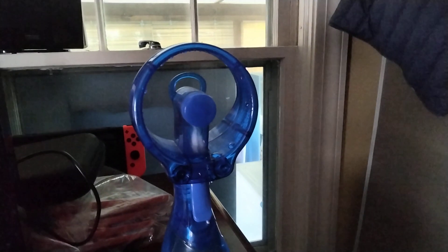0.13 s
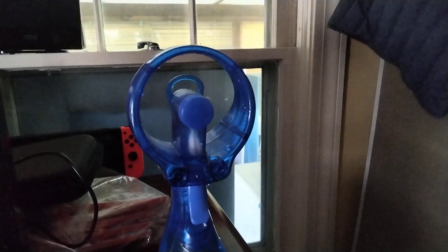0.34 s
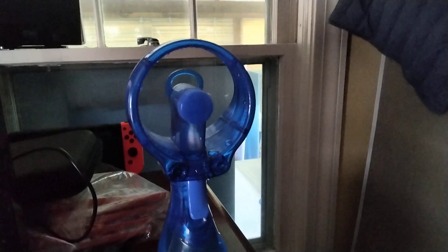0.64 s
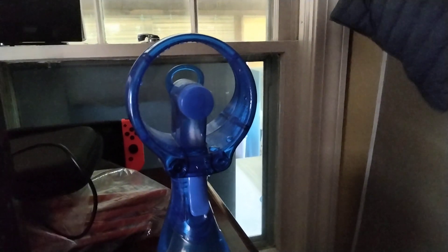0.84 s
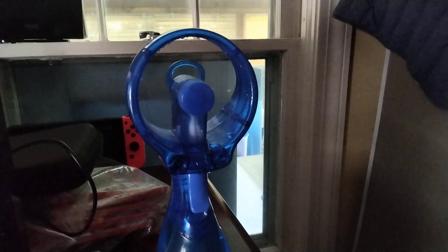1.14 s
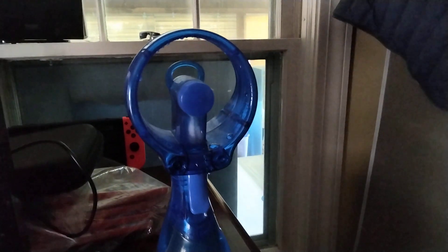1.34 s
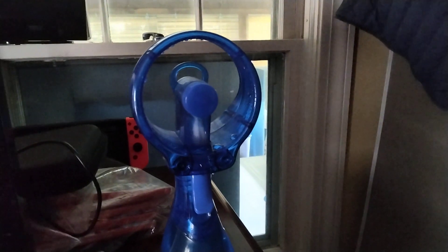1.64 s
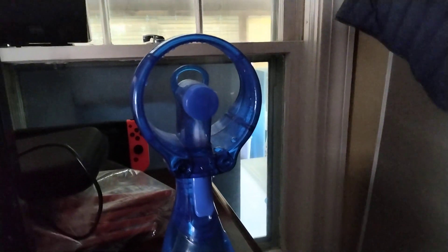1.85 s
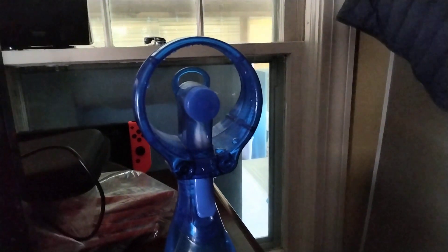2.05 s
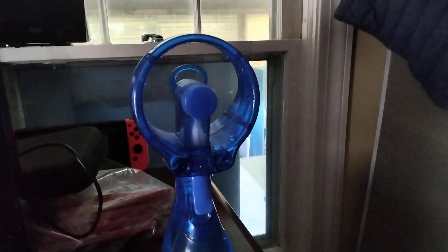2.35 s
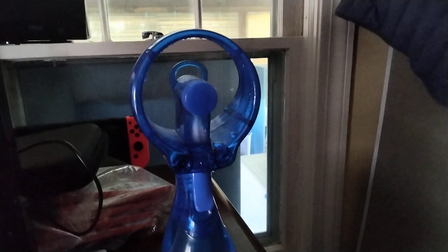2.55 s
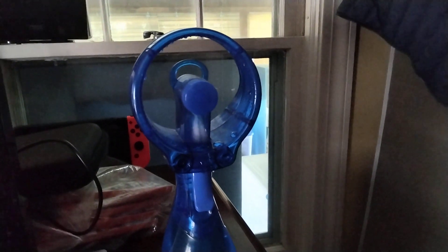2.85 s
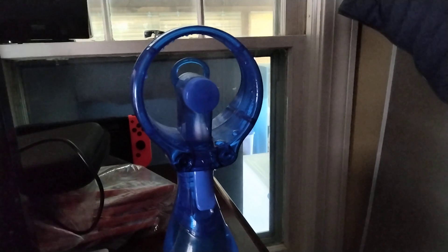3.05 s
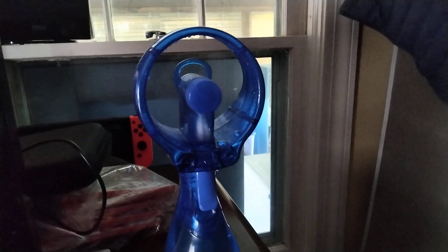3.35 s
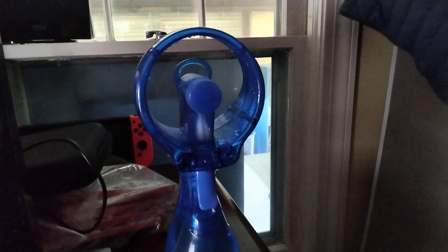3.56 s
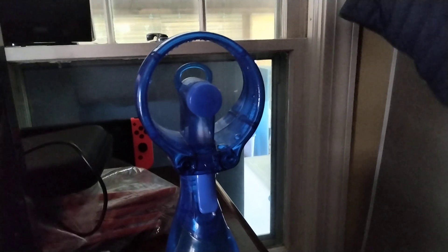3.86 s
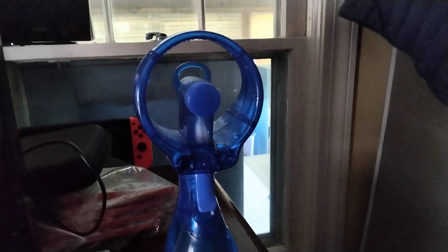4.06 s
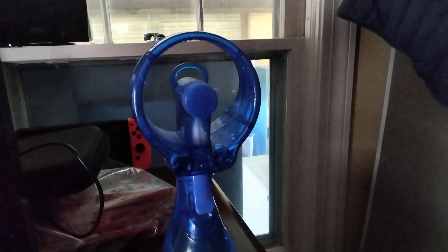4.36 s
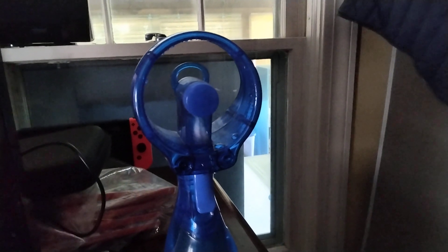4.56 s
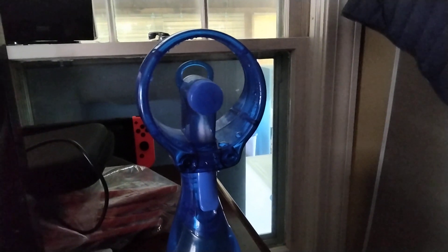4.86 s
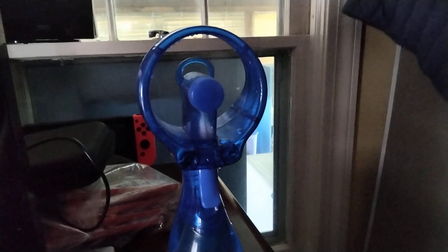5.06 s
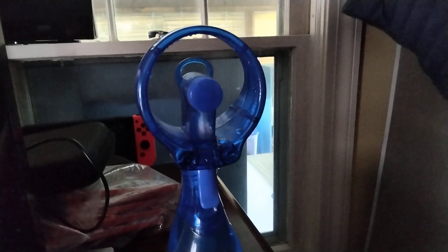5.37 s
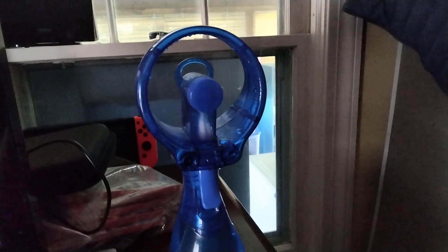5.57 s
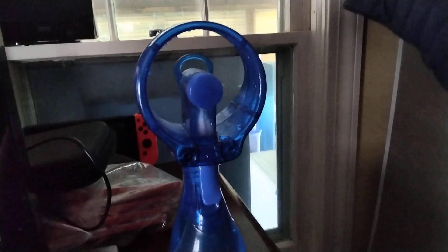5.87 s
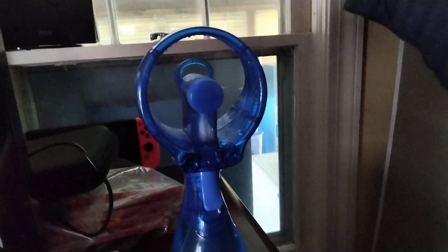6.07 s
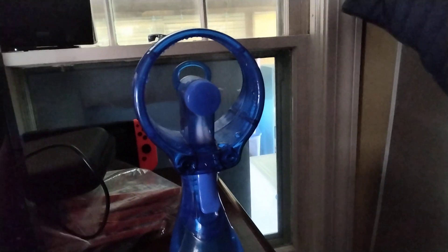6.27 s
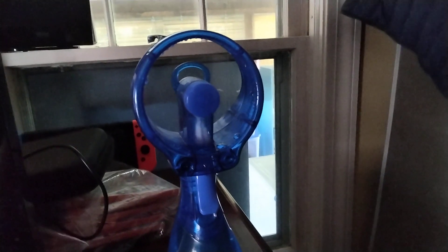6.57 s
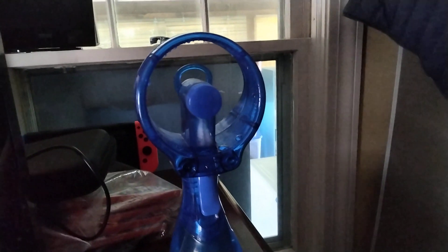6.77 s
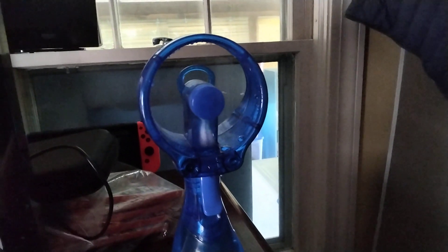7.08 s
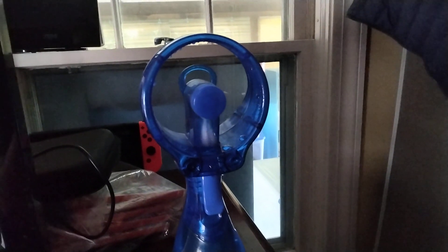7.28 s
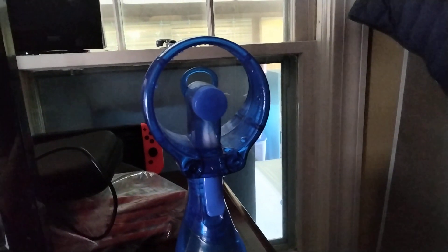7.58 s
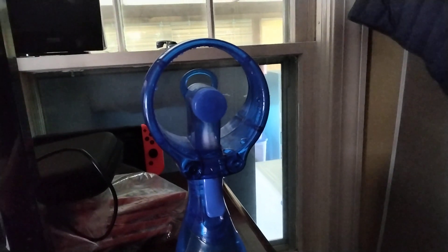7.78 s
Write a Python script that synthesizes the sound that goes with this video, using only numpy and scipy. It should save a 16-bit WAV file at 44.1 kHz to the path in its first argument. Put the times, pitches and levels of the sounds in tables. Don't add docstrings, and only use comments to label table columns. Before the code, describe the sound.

Steady close-up run of a tiny handheld fan indoors: deep fluttering wind rumble, stronger on the right, soft air rush and faint shrill buzzing whine.

```python
import sys
import numpy as np
from scipy import signal
from scipy.fft import rfft, irfft, next_fast_len
from scipy.io import wavfile
from scipy.ndimage import uniform_filter1d, map_coordinates

SR = 44100
rng = np.random.default_rng(int(sys.argv[2]) if len(sys.argv) > 2 else 0)


def transcribe(u):
    v = np.clip(np.atleast_2d(u).T, -1, 1)
    q = np.round(v * 32767).astype(np.int16)
    wavfile.write(sys.argv[1], SR, q)


def ratio(d):
    e = np.asarray(d, float) / 20
    return 10 ** e


N = 350154

LEFT_LAG_SAMPLES = 5.55


def rms_one(x):
    return x / np.sqrt(np.mean(x ** 2) + 1e-20)


def drift(rate, size, per_s):
    at = np.arange(size) * rate / per_s
    knots = rng.standard_normal((2, int(size * 40 / per_s) + 9))
    grid = np.arange(knots.shape[1])
    first = np.interp(at, grid, knots[0])
    second = np.interp(at * .63 + .5, grid, knots[1])
    return .87 * first + .87 * second


def colour(x, spectrum, rate):
    size = next_fast_len(len(x))
    hz = np.fft.rfftfreq(size, 1 / rate) + 1e-3
    table = np.array([(1, -90)] + list(spectrum) + [(rate, -90)])
    gain = ratio(np.interp(np.log(hz), np.log(table[:, 0]), table[:, 1]))
    return irfft(rfft(x, size) * gain, size)[:len(x)]


def lagged(x, samples):
    size = next_fast_len(N)
    delay = np.exp(-2j * np.pi * samples * np.fft.rfftfreq(size))
    return irfft(rfft(x, size) * delay, size)[:N]


def rush():
    # f/Hz, density/dB per Hz
    air_spectrum = [(60, -37), (200, -2.5), (400, 1.5), (640, -2.5), (850, 0), (1100, -3.5), (1700, -0.5),
                    (2600, -8), (3300, -12.5), (4200, -8), (5200, -10), (7300, -12.5), (7700, -12.5),
                    (15000, -33)]
    direct, left, right = (rms_one(colour(w, air_spectrum, SR)) for w in rng.standard_normal((3, N)))
    diffuse_share = .55
    near = np.array([lagged(direct, LEFT_LAG_SAMPLES), direct])
    diffuse = np.array([left, right])
    swell = ratio(-64 + .9 * drift(5, N, SR))
    return swell * (np.sqrt(1 - diffuse_share) * near + np.sqrt(diffuse_share) * diffuse)


def hum(angle):
    # multiple of the speed, rms level/dB
    low_tones = [(2, -72), (4, -71.5), (6, -77), (8, -82), (10, -78), (12, -79), (14, -80.5), (15, -87),
                 (16, -88), (18, -85), (20, -84), (21, -87), (22, -84), (25, -85)]
    # multiple of the speed, rms level/dB, left minus right/dB
    high_tones = [(24, -81, -7), (27, -79, -12), (30, -88, 10), (33, -87, 10), (42, -78.5, 0),
                  (48, -89, -3), (51, -95, 0), (54, -92, 0), (60, -82, 3), (66, -86, 0), (69, -88, 0),
                  (72, -82, 0), (75, -85, -3), (78, -86, 0), (87, -87, 6), (90, -87, 0), (96, -88, 4),
                  (99, -87, -5), (105, -87, -3)]
    left, right = np.zeros((2, N))
    for order, db, pan_db in [(k, db, 0) for k, db in low_tones] + list(high_tones):
        level = ratio(db + 1.3 + 2.4 * drift(9, N, SR))
        tone = level * np.sin(2 * np.pi * (round(order) * angle + rng.random()))
        left += ratio(pan_db / 2) * tone
        right += ratio(-pan_db / 2) * tone
    return np.array([lagged(left, LEFT_LAG_SAMPLES), right])


def whine(angle):
    # angle/turns, level in the 12 kHz ring/dB, level in the 9.5 kHz ring/dB
    contacts = [
        (.05, -15, -11),
        (.12, -17, -8),
        (.27, -9, -11),
        (.40, -12, -9),
        (.48, -10, -13),
        (.56, -10, -15),
        (.62, -3, -6),
        (.72, -12, -11),
        (.79, -7, -13),
        (.95, 0, -4),
    ]
    # f/Hz, level/dB
    can_low = [
        (1500, -60),
        (2000, -36),
        (3000, -34),
        (5000, -29),
        (7100, -28),
    ]
    # f/Hz, level/dB
    can_left = [(7700, -42), (8350, -20), (8630, -35), (8950, -11), (9150, -17), (9480, -3.5), (9950, -11),
                (10650, -4), (11200, -7), (11700, -4.5), (12550, -25), (13300, -14), (14550, -27),
                (15200, -18)]
    # f/Hz, level/dB
    can_right = [(7700, -41), (8350, -18), (8630, -35), (8950, -12), (9200, -18), (9480, -7), (9900, -12),
                 (10600, -10), (11500, 1.5), (12200, -2.5), (12800, -13), (13600, -11), (14550, -27),
                 (15100, -17)]
    steps, mean_speed = 1024, 70.7
    turns = int(angle[-1]) + 2
    rate = steps * mean_speed

    def band(x, low_hz, high_hz):
        return signal.sosfiltfilt(signal.butter(2, [low_hz, high_hz], "band", fs=rate, output="sos"), x)

    def wearing(db, slow_db, knots_per_s, jitter_db):
        slow = slow_db * drift(knots_per_s, turns, mean_speed)
        return ratio(db + slow + jitter_db * rng.standard_normal(turns))

    upper, lower = np.zeros((2, turns, steps))
    for at, upper_db, lower_db in contacts:
        upper[:, int(at * steps)] = wearing(upper_db, 1.0, 1.2, .35)
        lower[:, int(at * steps)] = wearing(lower_db, 2.0, 1.1, 1.1)
    high_ring = band(upper.ravel(), 11000, 12800)
    low_ring = band(lower.ravel(), 8300, 11000)
    around_contacts = uniform_filter1d(uniform_filter1d(upper.ravel(), size=40), size=40)
    pressure = rms_one(.8 + 60 * around_contacts)
    ports = []
    for can, low_lead in ((can_left, 1), (can_right, 0)):
        wear = np.pi * .5 * drift(.4, turns, mean_speed)
        old, new = rng.standard_normal((2, steps))
        surface = np.outer(np.cos(wear), old) + np.outer(np.sin(wear), new)
        scrape = ratio(-32.5) * surface.ravel() + ratio(-39.5) * rng.standard_normal(surface.size)
        outside_rings = ratio(8) * scrape - band((ratio(8) - 1) * scrape, 8700, 12800)
        force = np.roll(high_ring, low_lead) + np.roll(low_ring, -low_lead) + pressure * outside_rings
        sound = colour(force, list(can_low) + list(can) + [(17000, -16)], rate)
        ports.append(map_coordinates(sound, [angle * steps], order=3))
    left, right = ports
    return ratio(-48.5) * np.array([lagged(left, LEFT_LAG_SAMPLES), right]) / np.std(right)


def eddy(hz):
    half = round(2.5 * SR / hz)
    u = np.pi * hz * np.arange(-half, half + 1) / SR
    return (1 - 3 * u ** 2) / (1 + u ** 2) ** 3


def eddies(low_hz, high_hz, per_cycle, spread_db, push_share):
    out = np.zeros(N)
    for hz in np.geomspace(low_hz, high_hz, 4):
        birth, strength, direction = rng.random((3, N))
        born = birth < per_cycle * hz / SR
        size = ratio(spread_db * np.minimum(-np.log(strength + 1e-9), 3))
        sign = np.where(direction < push_share, 1, -1)
        out += signal.fftconvolve(born * size * sign, eddy(hz), "same")
    return rms_one(out)


def thumps(table):
    margin = SR // 2
    out = np.zeros(N + SR)
    for s, db, hz in table:
        shape = eddy(hz)
        start = round(s * SR) + margin - len(shape) // 2
        out[start:start + len(shape)] += ratio(db) * shape
    return out[margin:margin + N]


def gusts(rows, calm_db):
    edge_s = 0.019
    t = np.arange(0, N, 32) / SR
    power = np.full(len(t), ratio(calm_db) ** 2)
    for s, length, db in rows:
        rise = 1 + np.tanh(2 * (t - s) / edge_s)
        fall = 1 - np.tanh(2 * (t - s - length) / edge_s)
        power += ratio(db) ** 2 * .25 * rise * fall
    return np.interp(np.arange(N) / SR, t, np.sqrt(power))


def buffeting():
    # t/s, peak level/dB, size as pitch f/Hz
    pushes_left = [(0.019, -43, 42.5), (0.063, -38, 50), (0.077, -38.0, 60), (0.12, -34.5, 50),
                   (0.137, -35, 42), (0.433, -39.5, 36), (0.629, -39, 50), (0.732, -34.5, 42),
                   (0.822, -30, 30), (0.845, -31, 60), (0.927, -32, 42), (1.021, -37, 42),
                   (1.67, -39.0, 50), (1.852, -31, 42), (1.951, -33, 36), (1.982, -35.5, 60),
                   (1.994, -31, 50), (2.591, -35, 42), (2.783, -44, 36), (3.112, -40, 30.4),
                   (4.688, -37, 30), (5.136, -29.5, 42), (5.157, -35, 42), (5.207, -45, 30),
                   (5.232, -33, 60), (5.246, -40, 50), (5.296, -37, 60), (5.316, -35, 60), (5.484, -34, 60),
                   (5.84, -32, 42), (5.976, -35.0, 49.7), (6.525, -31, 30), (6.97, -39.0, 36),
                   (7.186, -38, 29.8), (7.22, -48, 58.7), (7.389, -36, 30), (7.507, -36, 50),
                   (7.522, -34, 30.2), (7.654, -36, 50), (7.806, -34, 30), (7.871, -43, 30)]
    pushes_right = [(0.032, -27, 36), (0.164, -31.5, 30), (0.181, -26, 42), (0.208, -27, 84),
                    (0.225, -25.5, 60), (0.269, -30, 84), (0.393, -28, 84), (0.438, -27, 71),
                    (0.443, -32, 99), (0.498, -32, 35.7), (0.75, -30.5, 36), (1.273, -31, 71),
                    (1.689, -38, 60), (1.799, -24, 100), (1.872, -29, 71), (2.026, -24, 71.4),
                    (2.205, -29, 60), (2.454, -30.5, 60), (2.637, -27, 84), (2.76, -30.0, 50),
                    (2.778, -26.0, 71), (2.93, -25, 72), (3.026, -26, 71), (3.036, -28, 71),
                    (3.07, -22.5, 140), (3.14, -22.5, 100), (3.193, -33, 50), (3.258, -26, 30),
                    (3.306, -34, 30), (3.321, -19, 83), (3.339, -29, 36), (3.356, -28, 84.4),
                    (3.412, -25.5, 120), (3.46, -20, 139), (3.498, -27, 36), (3.651, -28.5, 71),
                    (3.687, -27.5, 71), (3.835, -30, 60), (4.02, -24, 71), (4.054, -32, 71), (4.1, -27, 84),
                    (4.111, -31.5, 42), (4.205, -30, 50.3), (4.239, -24.5, 85), (4.31, -25.5, 50.4),
                    (4.403, -24.5, 99), (4.609, -23, 101), (4.619, -28, 41), (4.686, -28.5, 36),
                    (4.72, -25.5, 84), (4.921, -23, 117), (5.264, -33, 30), (5.395, -25.5, 50.5),
                    (5.423, -29, 35.8), (5.447, -28.5, 99), (5.532, -24, 112), (5.715, -28.5, 71.4),
                    (6.227, -33, 36), (6.681, -36, 36), (6.975, -38, 36)]
    # t/s, peak level/dB, size as pitch f/Hz
    pulls_left = [(0.086, -38, 36), (0.102, -35, 42), (0.305, -35, 50), (0.344, -48, 30), (0.406, -42, 30),
                  (0.645, -34.5, 42), (0.753, -37, 30), (0.782, -36.5, 30), (0.897, -41, 30),
                  (1.0, -41, 30), (1.696, -41, 30), (1.908, -38, 30), (2.016, -39.0, 30), (2.952, -38, 30),
                  (3.389, -37.0, 36), (4.95, -47, 30), (5.051, -44, 36), (5.395, -34, 30), (5.441, -42, 60),
                  (5.553, -35, 42), (5.573, -35, 36), (5.805, -34, 30), (5.863, -36, 36), (6.509, -42, 50),
                  (6.646, -35, 30), (6.703, -35, 42), (6.733, -38, 30), (6.784, -33, 30), (6.849, -31, 30),
                  (6.871, -36, 30), (7.01, -41, 30), (7.359, -39.0, 30), (7.461, -38, 36), (7.893, -40, 30)]
    pulls_right = [(0.054, -24, 101), (0.105, -22.5, 70.4), (0.112, -33, 119), (0.289, -25, 60),
                   (0.301, -28, 50), (0.402, -24, 60), (0.412, -23.5, 100), (0.417, -20.5, 99),
                   (0.425, -23.5, 84), (0.461, -29, 50), (0.469, -27, 71), (1.291, -31, 59),
                   (1.702, -24, 50), (1.804, -29, 84), (1.927, -34, 30), (2.267, -27.5, 71),
                   (2.592, -22.5, 42), (2.606, -24.5, 50), (2.622, -25.5, 60), (2.674, -32.0, 42),
                   (2.805, -38, 36), (2.869, -28.5, 30), (2.944, -28.5, 84), (2.991, -27, 60),
                   (3.001, -28.5, 84), (3.129, -36, 60), (3.156, -25, 60), (3.17, -29, 30),
                   (3.178, -28, 71), (3.408, -30.5, 36), (3.472, -31.5, 50), (3.672, -32, 100),
                   (3.718, -32, 30), (3.767, -31, 42.5), (3.777, -25.5, 84), (3.877, -27, 50.6),
                   (4.005, -27.5, 41.7), (4.217, -16, 86.2), (4.353, -30.5, 50), (4.501, -28.5, 71.6),
                   (4.742, -33.5, 30), (4.813, -32, 36), (4.916, -31, 30), (5.036, -28.5, 43),
                   (5.524, -29, 30), (5.55, -24, 84), (5.64, -30.5, 50), (6.327, -26, 100),
                   (6.335, -29, 70.5), (6.417, -29, 42), (6.777, -33, 30), (6.874, -30.5, 30),
                   (7.547, -29.5, 42)]
    # t/s, peak level/dB, size as pitch f/Hz
    flicks_left = [(.638, -43, 100), (.788, -41, 100), (.904, -39, 95), (1.009, -41, 105),
                   (2.782, -44, 105), (3.228, -40, 80), (4.449, -40, 75), (5.991, -42, 75),
                   (6.499, -41, 75), (7.888, -39, 110), (7.901, -37.5, 90)]
    # t/s, peak level/dB before a 12.5 dB lift
    flicks_right = [(0.027, -52), (0.055, -55), (0.107, -56), (0.419, -40.5), (0.43, -45), (1.704, -55),
                    (2.598, -41.5), (2.616, -41), (3.07, -57), (3.141, -43.5), (3.16, -39.5), (3.319, -46),
                    (3.411, -39.5), (3.46, -54), (3.691, -55), (3.783, -45.5), (4.104, -52), (4.217, -40),
                    (4.311, -40.5), (4.371, -49), (4.469, -55), (4.622, -41), (4.63, -41.5), (4.637, -45.5),
                    (4.918, -65), (6.334, -58)]
    # start t/s, length/s, level/dB
    gusts_left = [(0, 0.15, -44), (.29, 0.18, -51), (.62, 0.53, -44.5), (1.1, 0.29, -53),
                  (1.62, 0.11, -39.5), (1.84, 0.2, -51), (2.57, 0.057, -56), (2.75, 0.076, -48),
                  (2.92, 0.067, -47), (3.17, 0.42, -49.5), (3.7, 0.3, -55), (4.2, 0.11, -61),
                  (4.44, 0.068, -47), (4.7, 0.3, -48.5), (5.11, 0.4, -46.5), (5.53, 0.12, -51),
                  (5.77, 0.24, -45), (6.05, 0.37, -52), (6.47, 0.7, -49.5), (7.17, 0.073, -47.5),
                  (7.39, 0.15, -48), (7.65, 0.35, -50.5)]
    # start t/s, length/s, level/dB, small eddies relative to it/dB
    gusts_right = [(0, .32, -35.5, -3), (0.393, 0.099, -32.5, 0.5), (0.72, 0.27, -42, -5.5),
                   (1.241, 0.28, -40, -3), (1.652, 0.22, -37.5, -1.5), (1.907, 0.4, -38, -9.5),
                   (2.413, 0.055, -38, -2.5), (2.585, 0.076, -36, -1), (2.748, 0.21, -37, -6),
                   (2.987, 0.57, -41, -0.5), (3.59, 0.31, -38.5, -3), (3.95, 0.15, -40, -10.5),
                   (4.196, 0.23, -43.5, -1), (4.338, 0.47, -42, -0.5), (4.874, 0.094, -46.5, 2),
                   (5.02, 0.094, -40, -22), (5.25, 0.36, -37, -14), (5.468, .28, -45, -2),
                   (5.84, 0.14, -43.5, -21), (6.226, 0.24, -36.5, -16.5), (6.51, 0.2, -44.5, -13),
                   (6.837, 0.14, -34.5, -8), (7.144, 0.098, -67, -14), (7.507, 0.058, -41, -19),
                   (7.62, 0.37, -56, -2)]

    left = ratio(-1.0) * gusts(gusts_left, calm_db=-53.5)
    left = left * eddies(26, 56, per_cycle=1.3, spread_db=3.0, push_share=.65)
    left = left + thumps(pushes_left) + thumps(flicks_left) - thumps(pulls_left)

    slow = ratio(-4.0) * gusts([(s, length, db) for s, length, db, _ in gusts_right], calm_db=-45)
    slow = slow * eddies(30, 60, per_cycle=1.1, spread_db=3.0, push_share=.6)
    small = ratio(-6.0) * gusts([(s, length, db + rel_db) for s, length, db, rel_db in gusts_right], calm_db=-56.5)
    small = small * eddies(70, 150, per_cycle=0.5, spread_db=3.5, push_share=.6)
    flutter = ratio(2.6 * drift(11, N, SR))
    flicks = thumps([(s, db + 12.5, 190) for s, db in flicks_right])
    right = flutter * (slow + small) + thumps(pushes_right) - thumps(pulls_right) + flicks
    return np.array([left, right])


def scene():
    # t/s, speed/turns per s
    motor_speed = [(0.0, 70.05), (0.4, 69.76), (0.85, 69.65), (1.2, 69.95), (1.65, 70.14), (2.15, 70.83),
                   (2.55, 70.74), (3.02, 70.14), (3.5, 71.3), (3.87, 71.7), (4.3, 71.2), (4.7, 71.3),
                   (5.1, 71.54), (5.9, 70.74), (6.3, 70.75), (6.7, 70.58), (7.43, 70.8), (7.94, 69.92)]
    s, turns_per_s = np.transpose(motor_speed)
    speed = np.interp(np.arange(N) / SR, s, turns_per_s)
    inertia_s = .15
    speed = uniform_filter1d(speed, size=round(inertia_s * SR), mode="nearest")
    angle = np.cumsum(speed) / SR
    return rush() + hum(angle) + whine(angle) + buffeting()


def band_limit(x):
    return signal.sosfilt(signal.butter(12, 15520, fs=SR, output="sos"), x)


def record(dry):
    # f/Hz, width/Hz, share taken out 0-1
    narrow_dips = [
        (2740, 140, .45),
        (3980, 220, .45),
        (6070, 140, .5),
        (7710, 180, .65),
    ]
    mix = signal.sosfilt(signal.butter(2, 17.8, "high", fs=SR, output="sos"), dry)
    for hz, width_hz, share in narrow_dips:
        mix = mix - share * signal.lfilter(*signal.iirpeak(hz, hz / width_hz, fs=SR), mix)
    return band_limit(mix)


dry = scene()
out = record(dry)
transcribe(out)
```